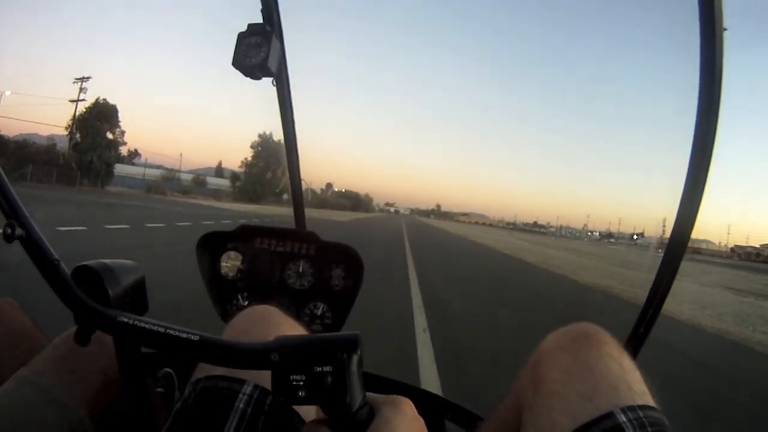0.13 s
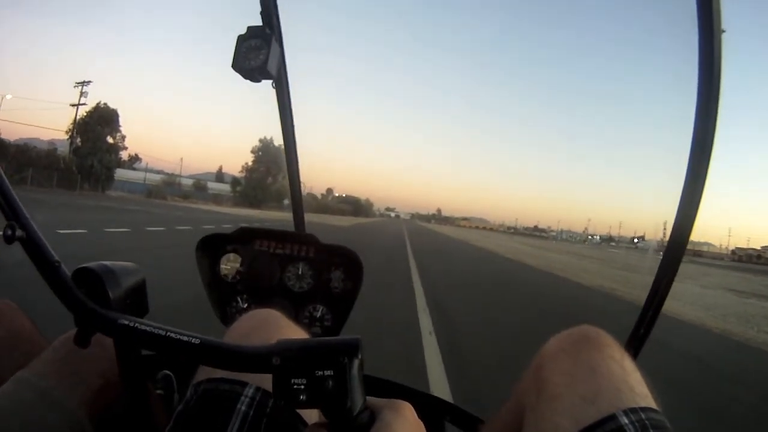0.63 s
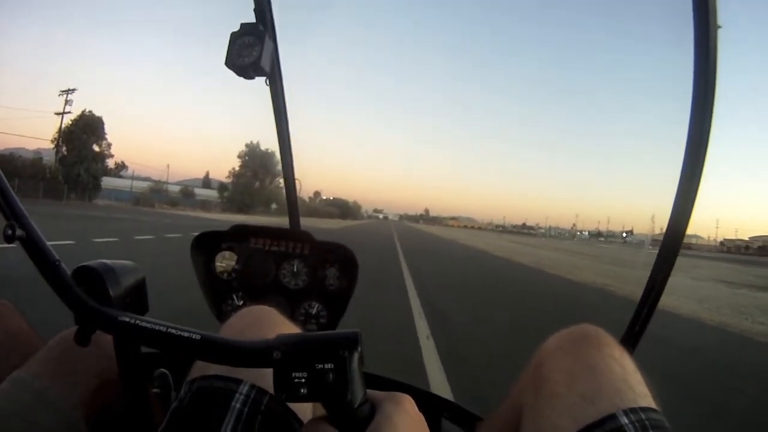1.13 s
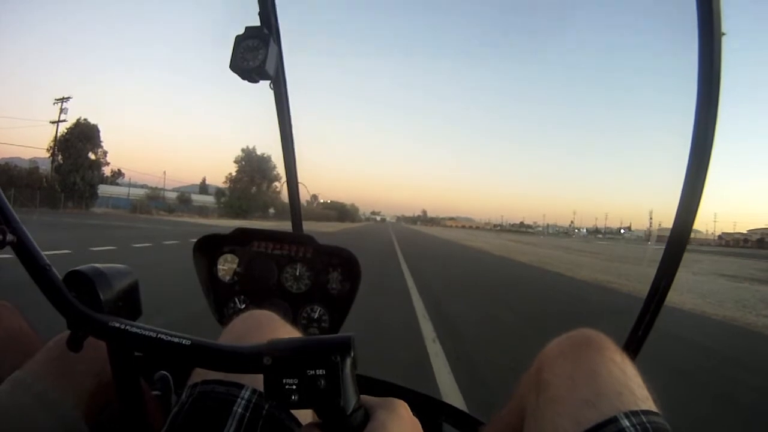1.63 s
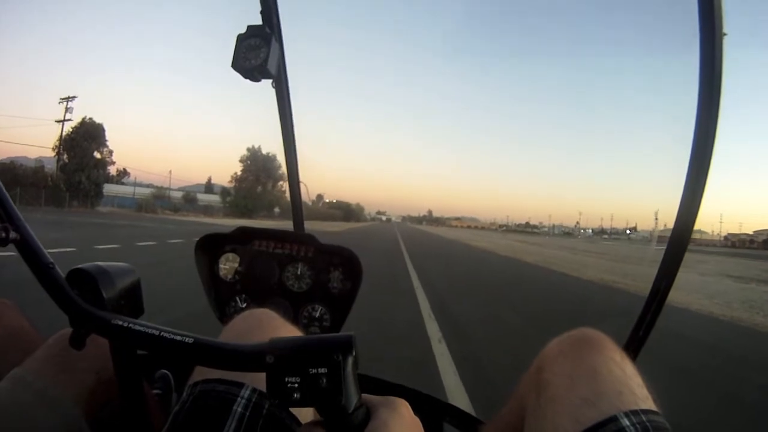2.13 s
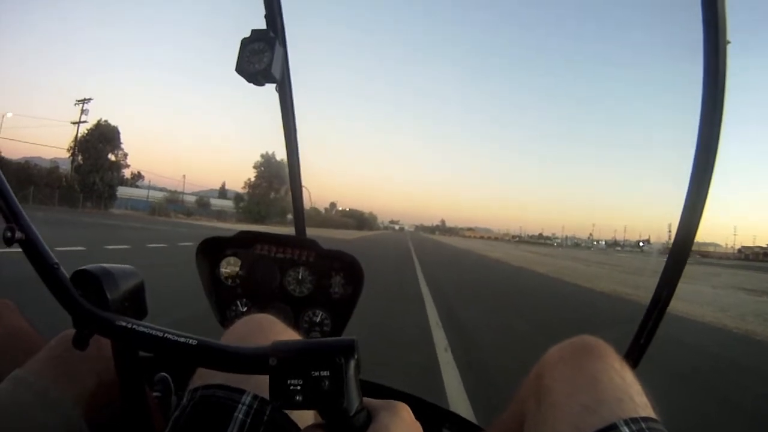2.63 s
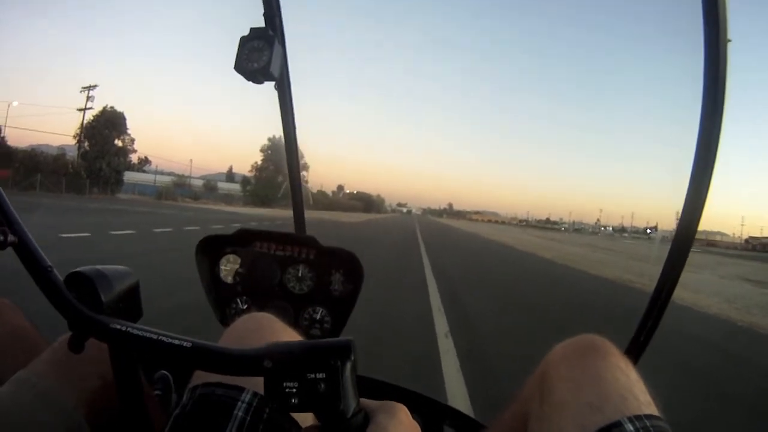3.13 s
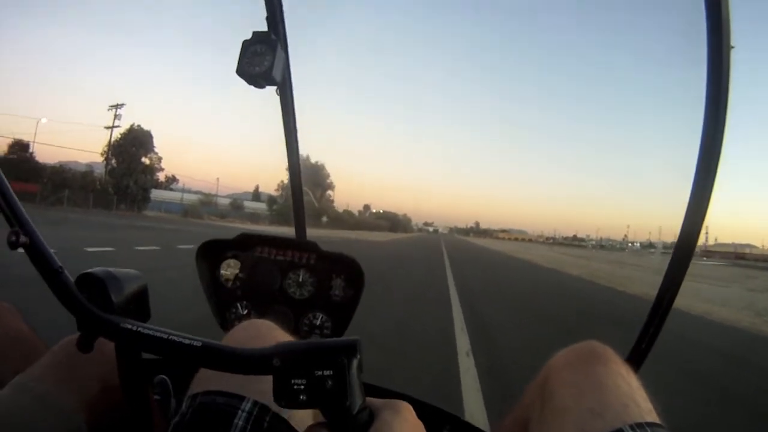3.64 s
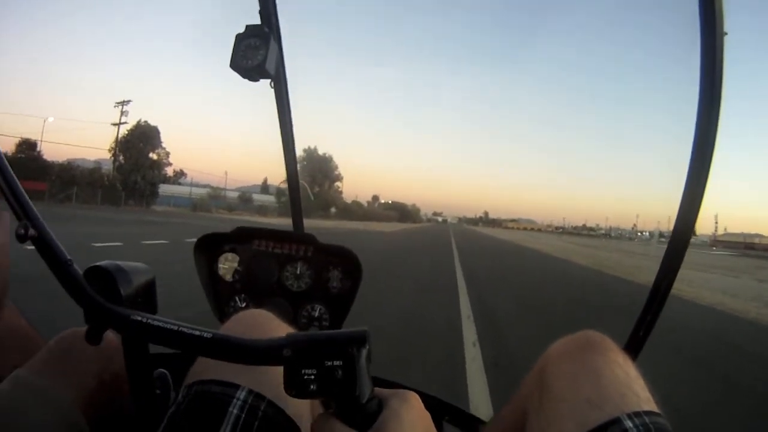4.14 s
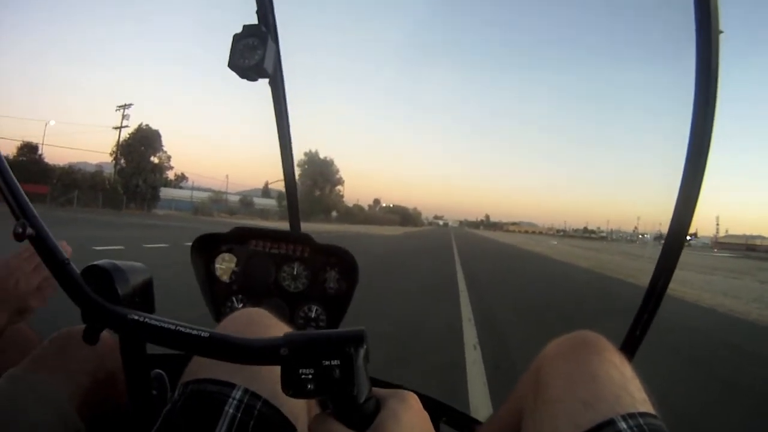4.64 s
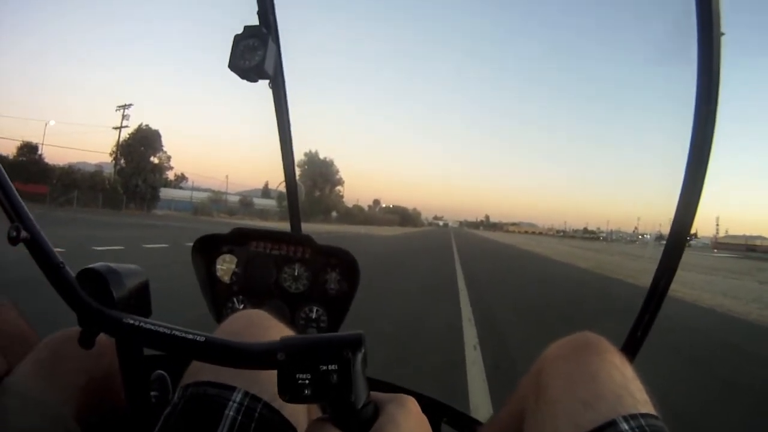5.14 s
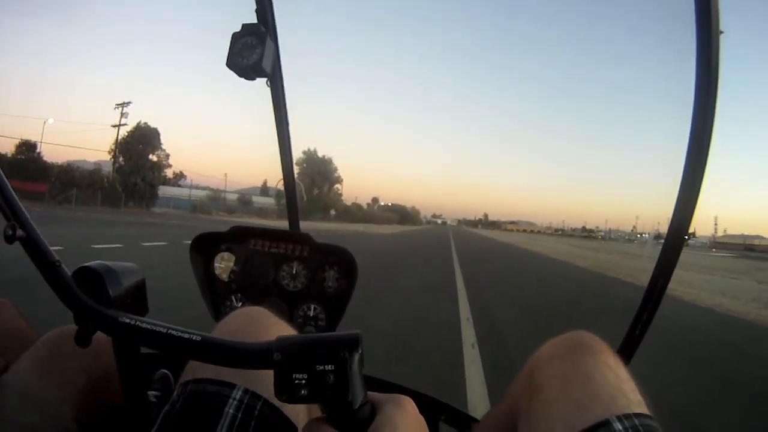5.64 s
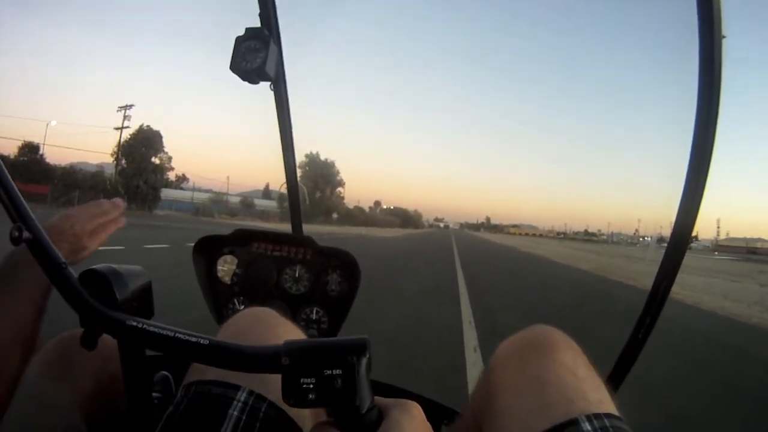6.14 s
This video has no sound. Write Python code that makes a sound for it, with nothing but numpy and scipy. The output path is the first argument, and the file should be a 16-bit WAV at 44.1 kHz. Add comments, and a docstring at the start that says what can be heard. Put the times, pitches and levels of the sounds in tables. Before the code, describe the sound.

From 0 to 6.3 seconds, the cabin of a small piston helicopter hovering low is filled by a loud, very steady engine drone around 88 hertz, sagging barely perceptibly in pitch near 5 seconds. Rougher engine overtones and a tail-rotor hum near 112 hertz thicken it. Deep airframe roar, steady hiss and a faint panel buzz near 3 kilohertz lie behind. Main blades swish overhead about 17.5 times a second, uneven in strength, with faint slaps. Louder dry slaps come at 1.4 and 1.7, then a tight burst from 2.07 to 2.35 peaks at 2.12; others follow at 2.9, 3.8 and 4.1. From 3 to 5.5 the second firing harmonic fades and air noise eases, leaving a plainer hum. Air rises slightly after 5.8, with shorter, choppier swishes and several small slaps until the end. The enclosed microphone sounds boxy, with dull, grainy treble.

```python
"""A four-cylinder engine drones on its firing tone inside the cabin of a small piston helicopter hovering low:
sines on the orders of its cycle. Overhead two main blades swish (swept noise) and slap (sharp pressure pulses
with noisy tails), and the tail rotor hums in sines. Air and airframe roar, hiss and buzz as filtered noise. The
microphone sits in a closed housing and is sampled slowly, each sample being held for four steps."""
import sys
import numpy as np
from scipy import signal
from scipy.fft import rfft, irfft, next_fast_len
from scipy.io import wavfile
from scipy.ndimage import map_coordinates

SR = 44100
rng = np.random.default_rng(int(sys.argv[2]) if len(sys.argv) > 2 else 0)


def file_out(sig):
    """Save sig as 16-bit WAV at sys.argv[1]."""
    # one column per channel
    cols = np.atleast_2d(sig).T
    # limit, then scale
    lim = np.clip(cols, -1, 1)
    pcm = np.round(lim * 32767).astype(np.int16)
    wavfile.write(sys.argv[1], SR, pcm)


def attenuation_scalar(level_db):
    """Turn a level in dB into a linear amplitude multiplier (20 dB per decade)."""
    decades = np.asarray(level_db, float) / 20
    return 10 ** decades


N = 276948


def unit(x):
    """Scaled to rms 1."""
    return x / np.sqrt(np.mean(x ** 2))


def curves(rows):
    """One value per sample for each column after the time."""
    times, *columns = np.transpose(rows)
    return [np.interp(np.arange(N) / SR, times, column) for column in columns]


def wobble(rate):
    """A smooth random curve, rate knots a second."""
    knots = rng.standard_normal(int(N * rate / SR) + 4)
    return map_coordinates(knots, [np.arange(N) * rate / SR])


def filtered(x, response):
    """x times a complex response of frequency."""
    size = next_fast_len(N + 8192)
    return irfft(rfft(x, size) * response(np.fft.rfftfreq(size, 1 / SR)), size)[:N]


def coloured(x, spectrum):
    """x through a (Hz, dB) curve read on a log frequency axis."""
    hz, db = np.transpose(spectrum)
    return filtered(x, lambda f: attenuation_scalar(np.interp(np.log(f + 1), np.log(hz), db)))


def resonance(f, hz, width):
    """Response of a two-pole resonator, 1 at its centre."""
    return 1j * f * width / (hz * hz - f * f + 1j * f * width)


def throb(turns, angle):
    """Cosine over a count of events, angle in cycles."""
    return np.cos(2 * np.pi * (turns + angle))


def tones(turns, table, waver_db, angles):
    """Sines on multiples of a turning part, each wavering slowly by itself."""
    lines = []
    for (multiple, db), angle in zip(table, angles):
        level = np.sqrt(2) * attenuation_scalar(db + waver_db * wobble(2.51))
        lines.append(level * throb(multiple * turns, angle))
    return lines


# engine speed: (time [s], crank speed [rpm])
ENGINE_SPEED = [(0.0, 2661.5), (0.8, 2659.8), (2.0, 2657.6), (3.9, 2657.4), (4.7, 2655.6), (5.3, 2646.8),
                (6.28, 2645.2)]


def firings():
    """Count of firings so far: two for each turn of the crank."""
    return np.cumsum(curves(ENGINE_SPEED)[0]) / 60 * 2 / SR


# firings for each blade passage
MAIN_GEAR, TAIL_GEAR = 5.037, 0.7857


def passages():
    """Count of main blades that have passed overhead, geared to the firings."""
    return firings() / MAIN_GEAR - 0.1


# strength of the downwash and spread of the blade swish:
# (time [s], downwash [dB], swish length [blade passages])
DOWNWASH = [(0, 2.5, 0.26), (1, 1.5, 0.33), (2.6, 1, .26), (3.5, 0, 0.29), (4.4, -1, 0.33), (5.3, -3, 0.32),
            (5.8, -2.5, 0.21), (6.28, -1, 0.12)]


def air(level_db, follows):
    """Gain of a layer that the downwash drives: follows is dB gained for each dB of downwash."""
    return attenuation_scalar(level_db + follows * curves(DOWNWASH)[0])


# spectrum of the roar before levelling: (frequency [Hz], relative density [dB per Hz])
ROAR_SPECTRUM = [(15, -120), (25, -10), (45, 1.5), (90, 4.5), (200, 1), (330, 0.5), (560, 1.5), (700, -12),
                 (1200, -16), (2500, -27.5), (6000, -42.5)]
# rms level where the downwash is 0 dB [dB], dB gained for each dB of downwash
ROAR_DB, ROAR_FOLLOWS = -28, 0.62
# below this the roar follows the downwash more [Hz], extra dB for each dB
DEEP_HZ, DEEP_FOLLOWS = 258, 0.6


def roar():
    """Exhaust and downwash shake the airframe: noise that throbs a little with each firing and each blade."""
    firing_db = 1.1 * throb(firings(), 0.25)
    blade_db = 1.23 * throb(firings() / MAIN_GEAR, -0.6)
    gusts_db = 1.12 * wobble(4) + 1.12 * wobble(40)
    noise = coloured(rng.standard_normal(N), ROAR_SPECTRUM)
    noise = unit(attenuation_scalar(firing_db + blade_db + gusts_db) * noise)
    deep = filtered(noise, lambda f: 1 / (1 + (f / DEEP_HZ) ** 4))
    return air(ROAR_DB, ROAR_FOLLOWS) * (noise - deep + air(0, DEEP_FOLLOWS) * deep)


# spectrum of the steady hiss before levelling: (frequency [Hz], relative density [dB per Hz])
HISS_SPECTRUM = [(150, -120), (300, -7.5), (700, 1), (1300, -7), (2500, -7), (3600, -21), (5000, -18.5),
                 (6000, -20)]
# rms level where the downwash is 0 dB [dB], dB gained for each dB of downwash
HISS_DB, HISS_FOLLOWS = -46, 1.4


def hiss():
    """Steady turbulent air: flickering noise that pulses slightly with each firing."""
    eddies = attenuation_scalar(1.66 * wobble(220) + 0.56 * throb(firings(), 0))
    noise = coloured(eddies * rng.standard_normal(N), HISS_SPECTRUM)
    return air(HISS_DB, HISS_FOLLOWS) * unit(noise)


# a panel buzzing with the engine: (centre [Hz], width [Hz], level over the hiss [dB])
PANEL = (2964, 300, -11.5)


def buzz():
    """A narrow rattle, kicked by every firing and stirred by every blade."""
    hz, width, over_hiss_db = PANEL
    firing_db = 1.8 * throb(firings(), -0.1)
    blade_db = 1.5 * throb(firings() / MAIN_GEAR, -0.55)
    kicks = attenuation_scalar(firing_db + blade_db + 3.4 * wobble(60)) * rng.standard_normal(N)
    ring = filtered(kicks, lambda f: resonance(f, hz, width) ** 2)
    return air(HISS_DB + over_hiss_db, HISS_FOLLOWS) * unit(ring)


# spectrum of the swish before levelling: (frequency [Hz], relative density [dB per Hz])
SWISH_SPECTRUM = [(150, -120), (300, -2.5), (700, 3), (1300, -4), (2500, -4.5), (3600, -13.5), (5000, -15),
                  (6000, -13.5)]
# noise level at the top of a typical swish of usual length [dB], dB for each dB of downwash
SWISH_DB, SWISH_FOLLOWS = -38, 0.62
# a shorter swish packs the same energy higher [blade passages]
USUAL_LENGTH = 0.27


def swish():
    """Each passing blade sweeps turbulent air over the canopy, a new size each time."""
    length = curves(DOWNWASH)[1]
    passes = passages()
    bell = np.exp(-((passes % 1 - 0.5) / length) ** 2)
    sweep = np.sqrt(USUAL_LENGTH / length) * bell
    size = attenuation_scalar(rng.standard_normal(130))[passes.astype(int) + 1]
    eddies = attenuation_scalar(2.0 * wobble(220)) * rng.standard_normal(N)
    swept = unit(coloured(eddies, SWISH_SPECTRUM))
    return air(SWISH_DB, SWISH_FOLLOWS) * size * sweep * swept


# loud blade slaps, levels before the slap's own tone filter: (time [s], level [dB])
LOUD_SLAPS = [(1.388, -28), (1.7254, -23), (2.0664, -20.5), (2.1225, -12.5), (2.1787, -18.5),
              (2.2353, -23.5), (2.3488, -22.5), (2.8644, -23), (3.8356, -22), (4.1173, -27), (5.7807, -26),
              (5.892, -26), (6.0676, -25.5), (6.119, -24), (6.2378, -21)]
# faint slaps, one a passage: level and scatter [dB], first and last moment [share of the passage]
FAINT_DB, FAINT_SCATTER_DB, FAINT_FROM, FAINT_TO = -36, 3, 0.2, 0.6
# time scale of the pulse [s], noise within the crack against the pulse
RISE_S, RAGGED = 0.00011, 1.16
# tail noise at its start [dB], time to fall by 60 dB [s]
TAIL_DB, TAIL_T60_S = -7, 0.07
# corners of the tone filter [Hz]
SLAP_LOW_HZ, SLAP_TOP_HZ = 298, 3480


def slaps():
    """A blade cutting the wake of the other: a sudden sharp pressure pulse, with a short ragged tail."""
    cracks = np.zeros(N + 3000)
    t = np.arange(3000) / SR
    u = t / RISE_S - 3
    step = -2 * u * np.exp(-u ** 2)
    tail = attenuation_scalar(TAIL_DB - 60 * t / TAIL_T60_S) * (u > 0)
    noise_level = RAGGED * np.exp(-(u / 4) ** 2) + tail

    passes = passages()
    count = int(passes[-1])
    moment = FAINT_FROM + (FAINT_TO - FAINT_FROM) * rng.random(count)
    faint_s = np.interp(np.arange(count) + moment, passes, np.arange(N) / SR)
    faint_db = FAINT_DB + FAINT_SCATTER_DB * rng.standard_normal(count)

    for start, db in list(LOUD_SLAPS) + list(zip(faint_s, faint_db)):
        slap = step + noise_level * rng.standard_normal(len(t))
        cracks[round(start * SR):][:len(t)] += attenuation_scalar(db) * slap
    return filtered(cracks[:N], lambda f: 1j * f / (SLAP_LOW_HZ + 1j * f) / (1 + 1j * f / SLAP_TOP_HZ) ** 3)


# thumps of the main blades: (multiple of blade passing, rms level before wavering [dB])
MAIN_THUMPS = [(1, -52), (2, -52), (3, -46), (4, -40)]
# hum of the tail blades: (multiple of blade passing, rms level before wavering [dB])
TAIL_HUM = [(0.5, -45), (1, -38), (2, -44), (3, -45), (4, -54)]


def rotors():
    """Both rotors are geared to the crank and sound on multiples of their blade passing."""
    main = tones(firings() / MAIN_GEAR, MAIN_THUMPS, 2.1, rng.random(len(MAIN_THUMPS)))
    tail = tones(firings() / TAIL_GEAR, TAIL_HUM, 2.7, rng.random(len(TAIL_HUM)))
    return sum(main + tail)


# tones of the four-stroke cycle, order 4 being the firing, before fading and wavering:
# (order [multiple of the cycle], rms level [dB])
CYCLE_TONES = [(3, -35), (4, -16.3), (5, -49), (7, -43), (8, -33), (9, -44), (10, -47), (11, -45),
               (12, -37), (13, -48), (14, -45), (15, -41), (16, -40), (17, -53), (18, -47), (19, -43),
               (20, -45), (21, -51), (22, -50), (23, -52), (24, -47), (28, -59), (30, -59), (31, -58),
               (32, -56), (33, -54), (35, -67), (36, -60)]
# the second firing harmonic fades while the firing tone swells slightly: (time [s], change of order 8 [dB])
OVERTONE_FADE = [(0, 3.5), (2.5, 3), (3.5, -1.5), (5.2, -11.5), (6.28, -14.5)]
# dB that orders 4 and 12 change for each dB of order 8
FIRING_FOLLOWS, THIRD_FOLLOWS = -0.048, 0.34


def engine():
    """Unequal cylinders fill in many orders of the cycle; the firing tone is far steadier than the rest."""
    fade_db, = curves(OVERTONE_FADE)
    fading = {4: FIRING_FOLLOWS * fade_db, 8: fade_db, 12: THIRD_FOLLOWS * fade_db}
    cycles = (firings() + 0.69) / 4
    firing = [row for row in CYCLE_TONES if row[0] == 4]
    others = [row for row in CYCLE_TONES if row[0] != 4]
    order = np.array(others)[:, 0]
    # overtones of the firing form one pulse, the higher ones arriving later through the pipe
    pulse_angles = -0.03 * ((order / 4) ** 2 - 1)
    angles = np.where(order % 4 == 0, pulse_angles, rng.random(len(order)))
    lines = tones(cycles, firing, 0.29, [0]) + tones(cycles, others, 1.77, angles)
    return sum(attenuation_scalar(fading.get(row[0], 0)) * line for row, line in zip(firing + others, lines))


def scene():
    """All sources meet in the cabin."""
    background = roar() + hiss() + buzz()
    blades = swish() + slaps() + rotors()
    return (background + blades + engine())[None]


# peaks and dips of the microphone housing: (centre [Hz], width [Hz], share added [ratio])
HOUSING = [(2750, 116, -0.34), (3030, 570, 0.72), (3610, 250, -0.27), (3820, 190, 0.32)]


def housing(sound):
    """Cavity resonances add to or cancel the direct sound; above 5.6 kHz the treble then falls away steeply."""
    def response(f):
        cavity = np.prod([1 + share * resonance(f, hz, width) for hz, width, share in HOUSING], axis=0)
        return cavity / (1 + (f / 5600) ** 14)
    return filtered(sound, response)


def sample_and_hold(sound):
    """Sampling at 12 kHz, each sample held for four steps, leaves mirrored images above 6 kHz."""
    slow = signal.resample_poly(sound, 40, 147)
    held = signal.resample_poly(np.repeat(slow, 4), 147, 160)[:N]
    return np.pad(held, (0, N - len(held)))


def roll_off(x):
    """The treble ends steeply here."""
    return signal.sosfilt(signal.butter(12, 15480, fs=SR, output="sos"), x)


def record(dry):
    """The cabin sound passes the microphone housing and is sampled slowly."""
    housed = housing(dry[0])
    finished = sample_and_hold(housed)[None]
    return roll_off(finished)


dry = scene()
out = record(dry)
file_out(out)
```